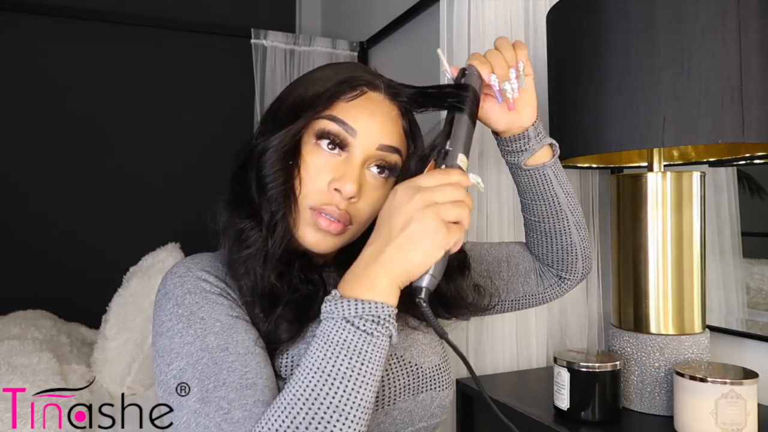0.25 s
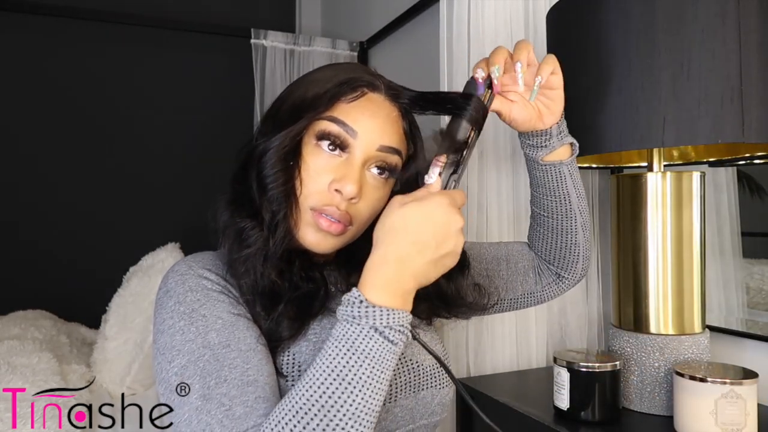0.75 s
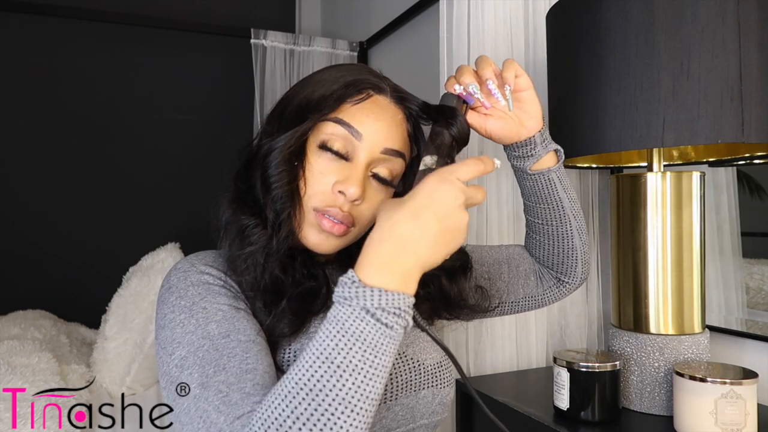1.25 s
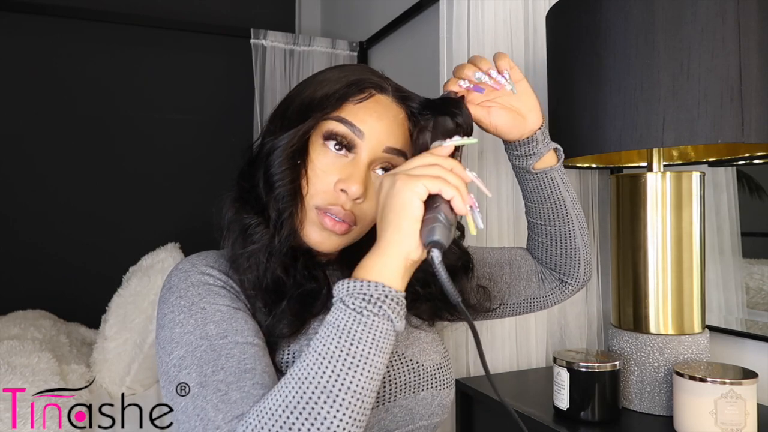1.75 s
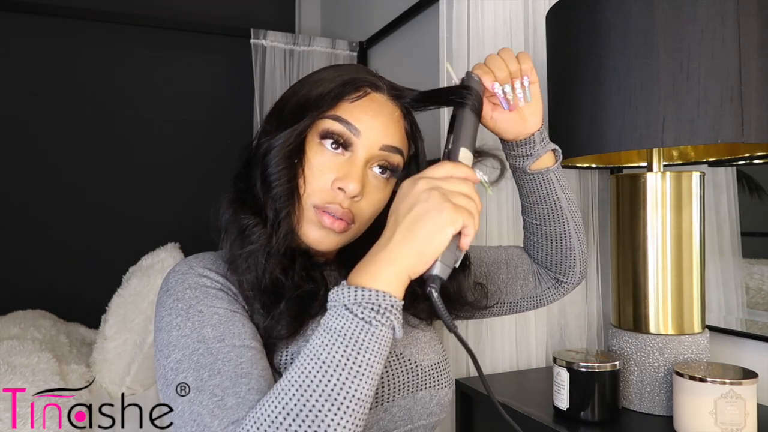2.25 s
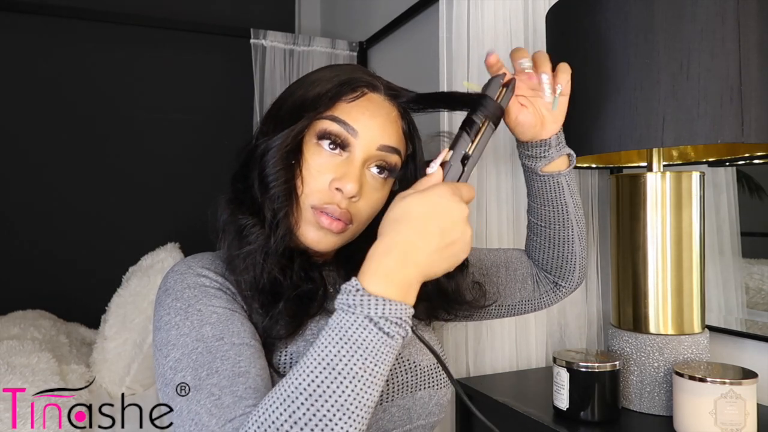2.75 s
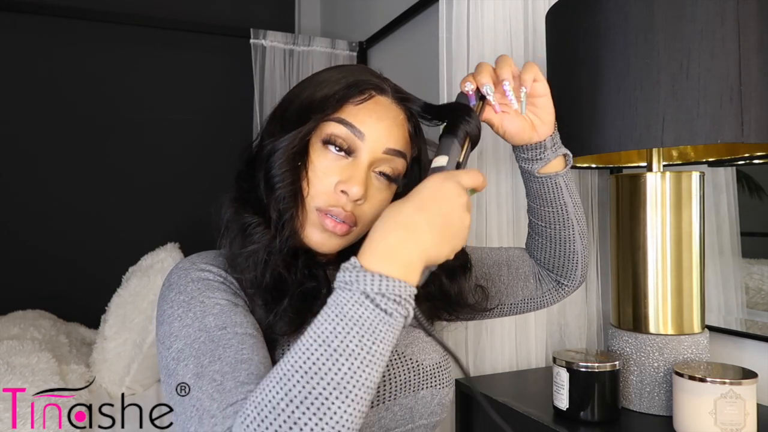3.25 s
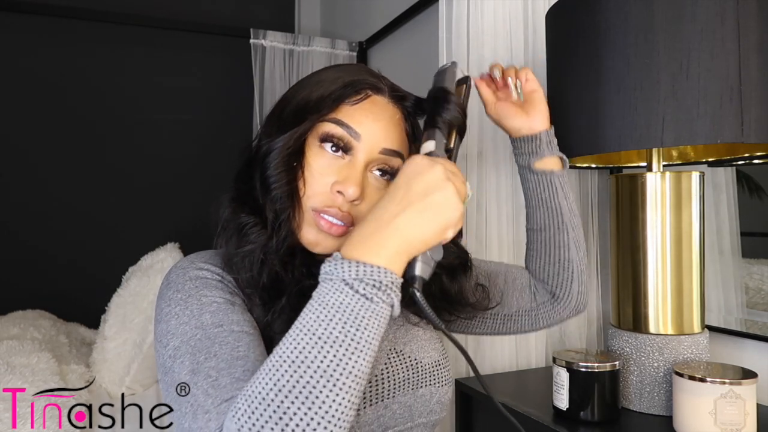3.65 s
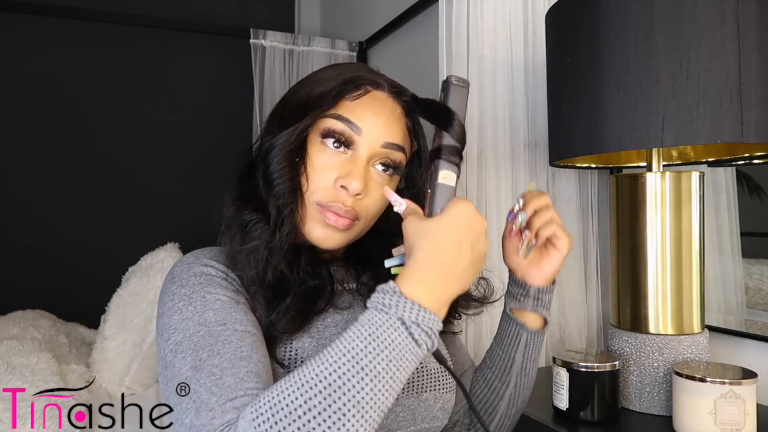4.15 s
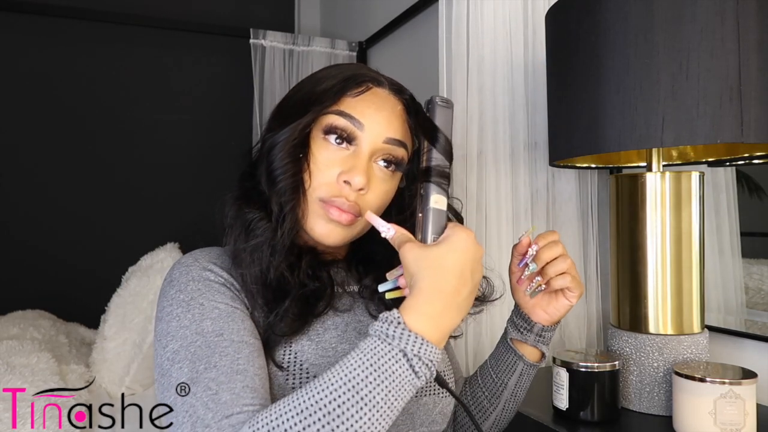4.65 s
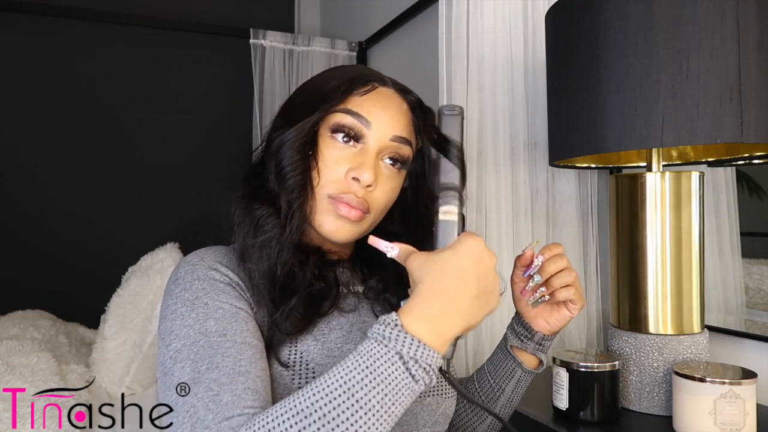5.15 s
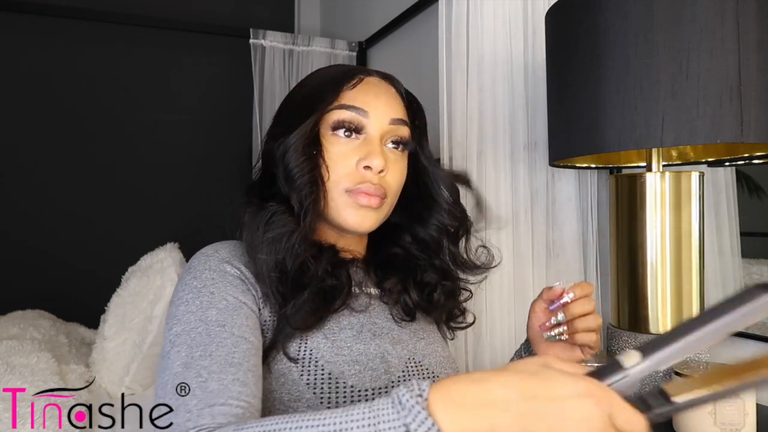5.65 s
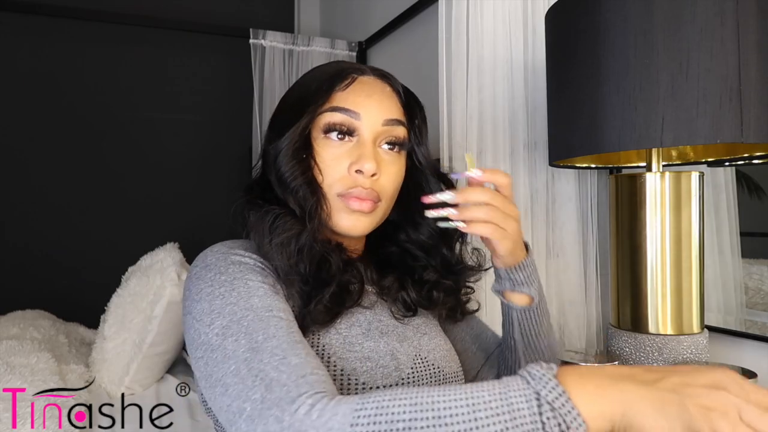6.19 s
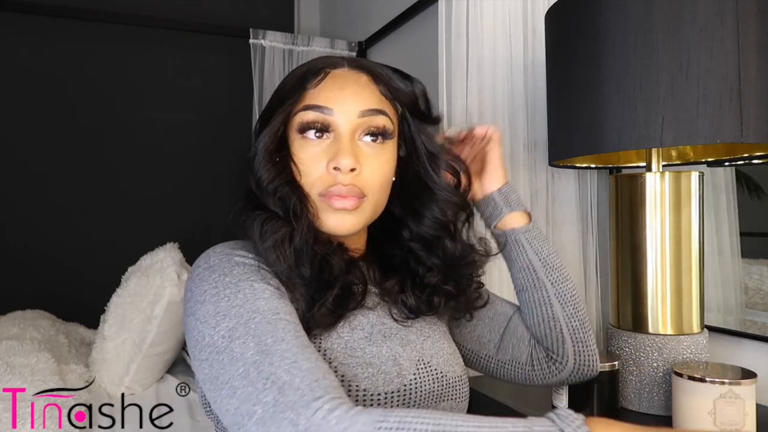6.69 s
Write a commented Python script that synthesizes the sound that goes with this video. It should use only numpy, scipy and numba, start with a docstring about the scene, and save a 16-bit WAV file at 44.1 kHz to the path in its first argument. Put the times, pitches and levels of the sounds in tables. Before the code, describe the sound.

Sharp plastic clicks from a hair straightener's plates, followed by a brief scrape and clatter as it is set on wood.

```python
"""Flat iron on a bedside table

A hair flat iron is worked close to a stereo microphone in a quiet bedroom: its plates tick, let hair
slip and snap shut, then it is dragged, knocked and rocked down on a wooden side table. The room
answers each blow; air hum, hiss and a thin whine lie underneath, and the gain ducks after loud knocks."""
import sys
import numpy as np
from scipy import signal
from scipy.fft import rfft, irfft, next_fast_len
from scipy.io import wavfile
from scipy.ndimage import uniform_filter1d, map_coordinates
from numba import njit

SR = 44100
rng = np.random.default_rng(int(sys.argv[2]) if len(sys.argv) > 2 else 0)


def dump(signal):
    """Clip the signal to [-1, 1] and save it as 16-bit WAV at the path in sys.argv[1]."""
    limited = np.clip(np.atleast_2d(signal).T, -1, 1)
    pcm = np.round(limited * 32767).astype(np.int16)
    wavfile.write(sys.argv[1], SR, pcm)


N = 305377

# Modes of the wooden table top. Each row: pitch in Hz, relative level in dB, t60 in seconds.
WOOD_MODES = [(117.8, 0.5, 0.12), (183.3, -9, 0.13), (232, -10.5, 0.066), (304.6, -6, 0.063),
              (422, 1.5, 0.021), (564, -7.5, 0.028), (667, -5, 0.03), (783, -2.5, 0.021),
              (836, -2.5, 0.017), (962, 0, 0.01), (1118, -7.5, 0.02), (1345, -7.5, 0.014),
              (1682, -11.5, 0.015), (1840, -11, 0.01), (2400, -7.5, 0.024), (2700, -13, 0.026)]


def iron_snaps():
    """Plates meet, fingers and cord tap the arms: the iron rings under a bright crack."""
    # Each row: start in seconds, level in dB, favoured pitch in Hz, rub in ms, reach in octaves.
    snaps = [(0.9887, -40.5, 4200, 1, .6), (0.989, -42, 1400, 1, 0.59), (0.998, -37, 4100, 1, .6),
             (0.9985, -36, 1700, 1.5, .5), (1.014, -39.5, 1600, 7, 0.72), (1.039, -52, 1590, 10, .4),
             (1.1088, -36.5, 4300, 0.6, .5), (1.168, -37, 2400, 1, .7), (1.2700, -31.5, 2550, .8, 0.17),
             (1.2703, -37, 1400, 2.2, .5), (1.272, -43, 4600, 4, .3), (1.308, -50, 2700, 6.4, .15),
             (1.4493, -44, 1070, 12, .7), (1.7956, -39.5, 2800, .81, 1.1), (2.035, -43, 910, 8.9, .6),
             (3.4152, -53.5, 4530, 5.3, 1.1), (3.487, -38, 825, 6, .5), (3.5005, -33.5, 1640, 7.7, .6),
             (3.588, -39.5, 805, 12, .6), (3.6701, -45, 3005, 4, .9), (3.7805, -5.5, 3560, 0.4, 0.15),
             (3.7815, -10.5, 1820, 1, .7), (3.786, -21.5, 1800, 1, .5), (4.7720, -28.5, 3160, 2.64, 1.0),
             (4.8407, -40.5, 2380, 0.95, 1.1), (5.0045, 2, 3000, 0.24, 0.98), (5.0135, -22, 2400, 1.5, 1.1),
             (5.2152, -6, 2560, 1.5, 1.3), (5.225, -14.5, 2125, 2, .8), (5.398, 1, 2940, 0.43, 1.15),
             (5.5641, -24, 2690, 3.3, 1.4), (5.8845, -36.5, 2150, 1.2, .6), (6.4108, -16, 2400, 3.9, 0.43),
             (6.42, -18, 2200, 14, 0.39), (6.578, -35, 2500, 5, .4), (6.666, -32, 3500, 2, .6)]
    # Plastic arms and plates. Each row: pitch in Hz, relative level in dB, t60 in seconds.
    iron_modes = [(560, -13, .014), (720, -9, .016), (980, -15, .012), (1370, -3, .013), (1700, -6, .01),
                  (2150, -5, .011), (2560, -15, .03), (3190, 3, .012), (3120, -28, .2), (3225, -26, .28),
                  (3300, -27, .25), (3390, -29, .18), (3640, -2, .008), (3980, 0, .011), (4700, -11, .004),
                  (5950, -9, .009)]
    # Tone of the crack. Each row: frequency in Hz, gain in dB.
    crack_eq = [(300, -33.5), (1500, 17.5), (4000, 20), (8000, -5), (12000, -14.5), (16000, -20)]
    return blows(snaps, iron_modes, crack_eq, crack_law=(-17.5, 10.23, 0.95), crack_share=.3,
                 scatter_db=1.2, bass_share=0.3, blur_hz=550)


def table_knocks():
    """The iron lands and rocks on the wood; every knock shakes the top a little differently."""
    # Each row: start in seconds, level in dB, favoured pitch in Hz, rub in ms, reach in octaves.
    knocks = [(5.889, -20, 199, 6.1, 1.2), (5.900, -27.5, 207, 7.3, 0.98), (5.989, -14, 750, 0.98, 1.07),
              (6.0148, -8.5, 380, 0.67, 1.21), (6.027, -16.5, 800, 7.6, 1.1), (6.043, -30, 490, 11, 1.1),
              (6.098, -26, 385, 1.3, 0.74), (6.412, -17, 203, 2, 1.5), (6.437, -11.5, 236, 2.6, 0.67),
              (6.45, 6.5, 1120, 0.54, 0.85), (6.4515, 4.5, 405, 0.15, 0.6), (6.465, -12.5, 840, 5, 1.1),
              (6.498, -8, 840, 5.3, 1.3), (6.514, -22, 790, 7.5, 0.58), (6.566, -2.5, 264, 2.3, 1.03),
              (6.5755, 0, 1120, 1.56, 0.96), (6.582, -5, 129, 11, 0.98), (6.6028, 3.5, 484, 1.7, 1.4),
              (6.615, -4, 160, 2.7, 1.2), (6.630, -11.5, 170, 3, 1.3), (6.645, -10.5, 700, 4, 0.9),
              (6.662, -10.5, 330, 4.7, 1.1), (6.678, -16.5, 351, 5.1, 0.66)]
    # Tone of the crack. Each row: frequency in Hz, gain in dB.
    crack_eq = [(100, -18.5), (1000, 16), (2500, 12), (5000, -19.5), (9000, -24), (16000, -68.5)]
    return blows(knocks, WOOD_MODES, crack_eq, crack_law=(-8, 5, -3), crack_share=0.63,
                 scatter_db=2, bass_share=0.14, blur_hz=0)


def blows(events, modes, crack_eq, crack_law, crack_share, scatter_db, bass_share, blur_hz):
    """A rounded push and after-slips ring the modes under a broad crack. Gives left, right, room send."""
    pan_db, pan_full_hz = -2, 700  # left minus right; deeper contacts sit nearer the middle
    base_db, db_per_octave, db_per_rub_doubling = crack_law  # crack against ring, from 1 kHz and 1 ms
    out = np.zeros((3, N + SR))
    ms = np.arange(4096) / SR * 1000
    chances = rng.standard_normal((len(events), 2, len(modes)))
    grits = rng.standard_normal((len(events), 2, len(ms)))
    for (start, db, hz, rub_ms, reach_oct), chance, grit in zip(events, chances, grits):
        first_blow = (ms == 0) / rub_ms  # lost in a long rub
        slips = 0.014 * rub_ms * grit[0] * np.exp(-ms / rub_ms)
        push = np.convolve(first_blow + slips, np.hanning(int(0.29 * SR / hz) + 3))  # about 0.29 cycle
        body = signal.fftconvolve(ring(modes, hz, reach_oct, chance, scatter_db), push)
        hit = body / np.abs(body).max()
        crack = colour(grit[1], crack_eq) * np.sqrt(ms) * np.exp(-ms / (crack_share * rub_ms))
        crack_db = base_db + db_per_octave * np.log2(hz / 1000) + db_per_rub_doubling * np.log2(rub_ms)
        hit[:len(ms)] += crack * undb(crack_db) / np.abs(crack).max()
        hit = signal.sosfilt(signal.butter(4, bass_share * hz, "high", fs=SR, output="sos"), hit)
        pan = np.array([[.5], [-.5]]) * pan_db * min(1, hz / pan_full_hz)
        i = int(start * SR)
        out[:2, i:i + len(hit)] += hit * undb(db + pan)
        send = blurred(hit, blur_hz) if blur_hz else hit
        out[2, i:i + len(send)] += send * undb(db)
    return out[:, :N]


def ring(modes, favour_hz, reach_oct, chance, scatter_db):
    """All modes start together; those within reach of the favoured pitch are shaken most. Peak 1."""
    hz, db, t60 = np.array(modes, float).T[:, :, None]
    t = np.arange(int(SR * t60.max())) / SR
    gain = undb(db + scatter_db * chance[0][:, None]) / (1 + (np.log2(hz / favour_hz) / reach_oct) ** 4)
    detuned_hz = hz * (1 + .01 * chance[1][:, None])
    sign = (-1) ** np.arange(len(hz))[:, None]  # neighbouring modes move the struck spot opposite ways
    tone = np.sum(sign * gain * np.sin(2 * np.pi * detuned_hz * t) * 1000 ** (-t / t60), axis=0)
    return tone / np.abs(tone).max()


def cord_and_drag():
    """A soft low cord rumble fades, then the iron slides on the wood under a flickering hiss."""
    # The cord first, then the iron's slides.
    # Each row: crest, swell and fade in seconds, chatter gain in dB, hiss level in dB.
    rubs = [(5.575, 0.031, 0.5, -28, -45.5), (6.03, 0.16, 0.098, -41, -29),
            (6.425, 0.025, 0.43, -51, -25.5), (6.621, 0.16, 0.12, -45.5, -24)]
    # Tone of the scrape. Each row: frequency in Hz, gain in dB.
    scrape_eq = [(400, 16), (1200, 10), (2200, 0.5), (4000, -10.5), (8000, -24.5), (16000, -63)]
    slips_per_s, spread_db = 850, 1.5  # small uneven slips shake the wood's modes
    slipping = rng.random(N) < slips_per_s / SR
    slips = slipping * undb(spread_db * rng.exponential(size=N)) * rng.choice([-1, 1], N)
    push = uniform_filter1d(level(slips, db=-21), size=12) * swells(rubs, column=3)
    body = ring(WOOD_MODES, favour_hz=390, reach_oct=1.19,
                chance=np.zeros((2, len(WOOD_MODES))), scatter_db=0)
    chatter = signal.fftconvolve(push, body / np.linalg.norm(body))[:N]
    hiss = colour(rng.standard_normal(N), scrape_eq) * undb(5 * walk(160))
    return chatter + level(hiss, db=0) * swells(rubs, column=4)


def hair():
    """Strands slip through the plates with a wide, bright, grainy hiss."""
    # Each row: crest, swell and fade in seconds, level in dB.
    strands = [(1.112, .01, 0.12, -57), (1.172, 0.01, 0.077, -50.5), (1.273, 0.004, 0.1, -43.5),
               (3.418, 0.013, 0.057, -53)]
    # Tone of the hiss. Each row: frequency in Hz, gain in dB.
    strand_eq = [(1200, -32), (2600, 11), (4000, 8), (8000, 6.5), (12000, -8), (16000, -28)]
    mid, side = colour(rng.standard_normal((2, N)), strand_eq) * undb(3.3 * walk(360))
    return level(mid + np.outer([1, -1], side), db=0) * swells(strands, column=3)


def blurred(hit, width_hz):
    """Summed over all directions, resonances blur: the walls get one short pulse, centred 2 ms in."""
    n = next_fast_len(len(hit), True)
    power = uniform_filter1d(np.abs(rfft(hit, n)) ** 2, size=max(1, int(width_hz * n / SR)))
    return np.roll(irfft(np.sqrt(np.abs(power)), n), SR // 500)[:len(hit) // 2]


def room(send):
    """Echoes thicken after a short gap, strongest from the near walls, and die band by band."""
    # Bedroom decay. Each row: frequency in Hz, t60 in seconds.
    decay = [(150, 0.5), (700, .3), (1800, 0.36), (3500, 0.4), (6000, .33), (10000, 0.12)]
    # Stereo width of the echoes. Each row: frequency in Hz, side minus mid in dB.
    width = [(150, -44.5), (700, -11), (1800, -31), (4400, -2.5), (9000, 9)]
    gap_s, near_wall_s, near_wall_db = 0.0022, .013, 5
    t = np.arange(SR // 2) / SR
    tail = 0
    for hz in 80 * 2. ** np.arange(8):
        octave = signal.butter(2, [hz / np.sqrt(2), hz * np.sqrt(2)], "band", fs=SR, output="sos")
        mid, side = signal.sosfilt(octave, rng.standard_normal((2, len(t))))
        echoes = mid + undb(along(width, hz)) * np.outer([1, -1], side)
        clumps = undb(2 * walk(120)[:len(t)])
        tail = tail + echoes * 1000 ** (-t / along(decay, hz)) * clumps
    tail *= 1 - np.exp(-(t / gap_s) ** 2)
    tail *= undb(near_wall_db * np.exp(-(t / near_wall_s) ** 4))
    return signal.fftconvolve(send[None], tail / np.linalg.norm(tail[0]), axes=1)[:, :N]


def air():
    """Room tone: centred rumble, wide hiss, wavering hum bands and a thin, out-of-phase whine."""
    # Tone of the bed. Each row: frequency in Hz, gain in dB.
    air_eq = [(12, -64.5), (20, -22.5), (33, -6.5), (49, -3), (134, -4.5), (154, -12), (182, -3.5),
              (234, -10), (301, -6.5), (347, -15.5), (377, -11), (410, -14.5), (10500, -44), (13500, -59),
              (16000, -83)]
    # Stereo width of the bed. Each row: frequency in Hz, side minus mid in dB.
    width = [(60, -34.5), (110, -11.5), (200, -8), (380, -1.5), (700, -2.5), (1290, -1), (2380, -1),
             (4400, -0.5), (8120, -5), (15000, 17)]
    # Hum bands. Each row: centre in Hz, width in Hz, level in dB.
    hums = [(53.8, 43, -50.5), (135.7, 79, -62.5), (194, 6, -67.5), (230, 13, -59.5), (298, 61, -61.5)]
    mid_db, whine_hz = -48.5, 13006
    mid, side = colour(rng.standard_normal((2, N)), air_eq) * undb(0.26 * walk(1))
    bed = level(mid, mid_db) + np.outer([1, -1], colour(side, width)) * undb(mid_db) / mid.std()
    t = np.arange(N) / SR
    for hz, width_hz, db in hums:
        phase = 2 * np.pi * hz * t
        bed += level(walk(width_hz) * np.cos(phase) + walk(width_hz) * np.sin(phase), db)
    whine = level(np.sin(2 * np.pi * whine_hz * t), db=-81)
    return bed + np.outer([1, -.5], whine)


def swells(rows, column):
    """Gain curve: each row climbs 30 dB over its swell to the column's dB, and drops 30 over its fade."""
    t = np.arange(N) / SR
    return sum(undb(r[column] - 30 * np.maximum((r[0] - t) / r[1], (t - r[0]) / r[2])) for r in rows)


def undb(db):
    """Decibels to gain."""
    return np.exp(np.asarray(db) * np.log(10) / 20)


def level(x, db):
    """Scale to an rms level."""
    return x * undb(db) / np.sqrt(np.mean(x ** 2))


def along(curve, hz):
    """Read an (Hz, value) curve on a log frequency axis."""
    points_hz, values = np.array(curve).T
    return np.interp(np.log(np.maximum(hz, 1)), np.log(points_hz), values)


def colour(x, eq):
    """Filter by an (Hz, dB) curve."""
    n = next_fast_len(x.shape[-1], True)
    gain = undb(along(eq, np.fft.rfftfreq(n, 1 / SR)))
    return irfft(rfft(x, n) * gain, n)[..., :x.shape[-1]]


def walk(rate_hz):
    """A waver: random steps at this rate, smoothed twice."""
    hold = int(SR / rate_hz)
    steps = np.repeat(rng.standard_normal(N // hold + 1), hold)
    return uniform_filter1d(uniform_filter1d(steps, hold), hold)[:N]


@njit
def follow(x, attack, release):
    """Envelope follower with separate rise and fall rates per sample."""
    envelope, out = 0., np.empty(len(x))
    for i in range(len(x)):
        envelope += (x[i] - envelope) * (attack if x[i] > envelope else release)
        out[i] = envelope
    return out


def scene():
    """Iron and table reach the left side a little late; room, air and slipping hair surround them."""
    # Tone that the plates throw sideways into the room. Each row: frequency in Hz, gain in dB.
    beam_eq = [(500, -5.5), (1400, 7), (2400, 5), (3200, -3.5), (4100, -2.5), (6000, 6), (10000, 8)]
    iron_send_db, wood_send_db, left_lag_s = -7.5, -3.5, .00003
    bass_hz = 95.9  # the table radiates little below this
    iron = iron_snaps()
    wood = table_knocks() + cord_and_drag() * undb([[-.7], [.7], [0]])  # panned slightly right
    wood = signal.sosfilt(signal.butter(3, bass_hz, "high", fs=SR, output="sos"), wood)
    left, right = (iron + wood)[:2]
    late_left = map_coordinates(left, [np.arange(N) - left_lag_s * SR], order=3)
    send = undb(iron_send_db) * colour(iron[2], beam_eq) + undb(wood_send_db) * wood[2]
    return np.array([late_left, right]) + room(send) + air() + hair()


def record(dry):
    """Gain control ducks after loud blows, peaks are rounded off and the top is cut."""
    threshold_db, ratio, attack_s, release_s = -31, 1.59, 0.034, 0.67
    top_hz = 16000
    rectified = uniform_filter1d(np.abs(dry).mean(axis=0), size=256)
    loudness = follow(rectified, 1 / (attack_s * SR), 1 / (release_s * SR))
    ducked = dry * np.minimum(1, undb(threshold_db) / (loudness + 1e-9)) ** (1 - 1 / ratio)
    rounded = ducked / (1 + np.abs(ducked) ** 4) ** (1 / 4)
    return signal.sosfilt(signal.ellip(8, .2, 70, top_hz, fs=SR, output="sos"), rounded)


dry = scene()
out = record(dry)
dump(out)
```